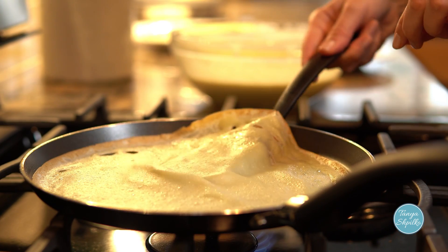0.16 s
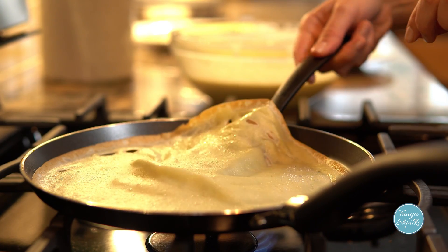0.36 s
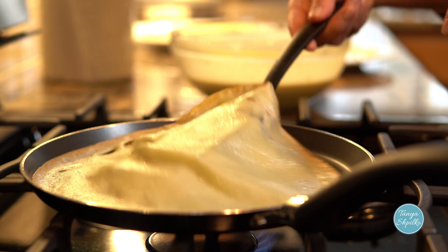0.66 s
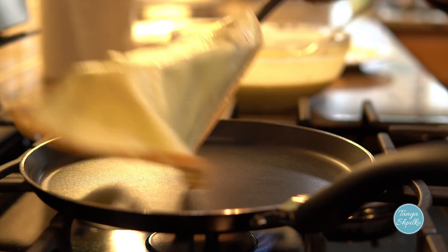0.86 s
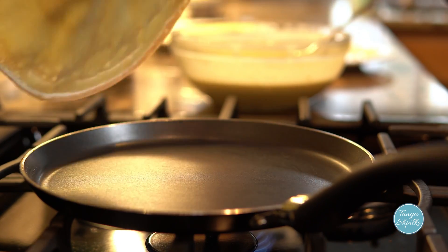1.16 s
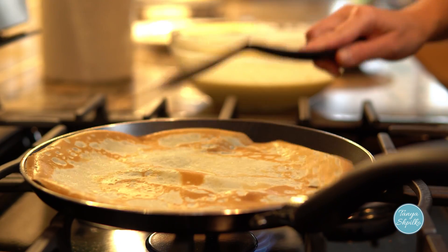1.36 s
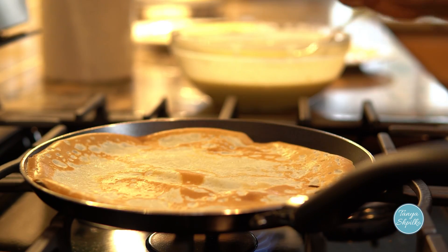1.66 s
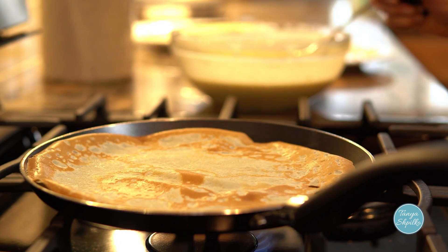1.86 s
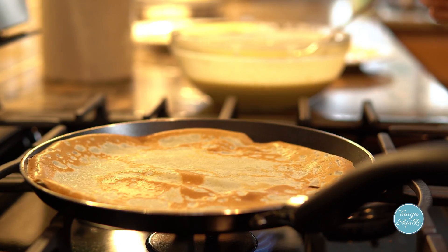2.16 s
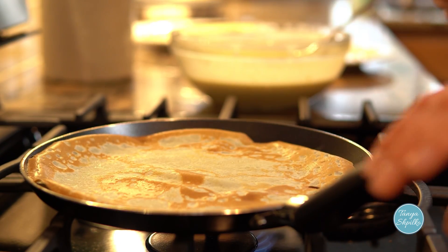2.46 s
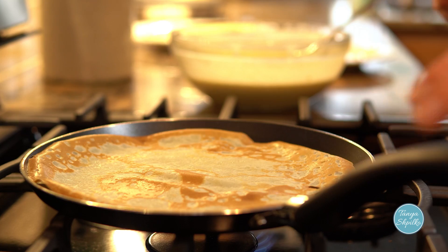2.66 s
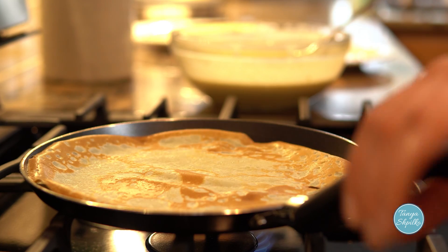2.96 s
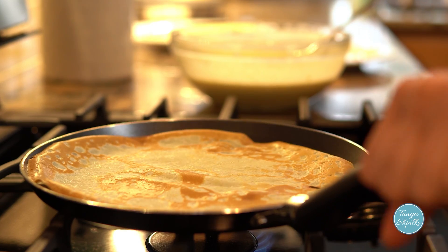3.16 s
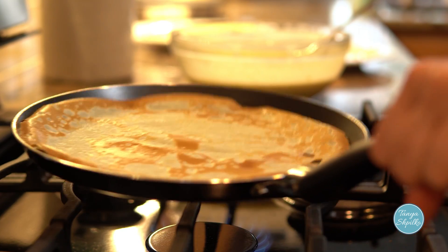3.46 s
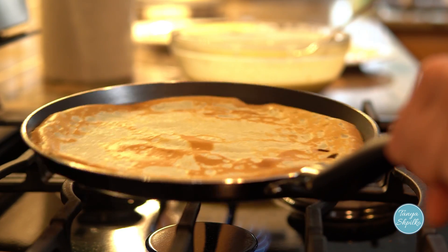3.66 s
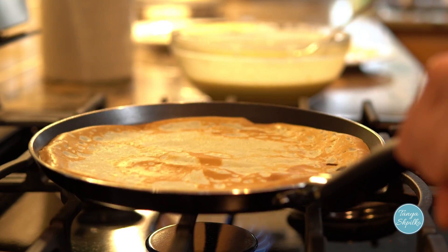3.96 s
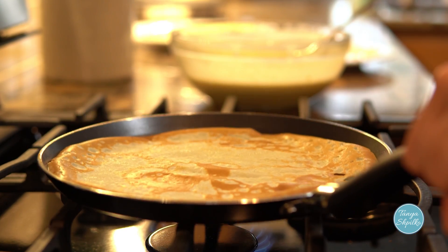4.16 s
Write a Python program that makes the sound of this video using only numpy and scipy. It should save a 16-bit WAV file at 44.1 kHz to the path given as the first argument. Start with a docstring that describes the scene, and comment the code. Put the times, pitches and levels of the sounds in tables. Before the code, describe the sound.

A spatula rasps under a thin crepe, it slaps wetly into a hot pan, sizzles and spits, then the pan scrapes and knocks on its grate.

```python
"""A small kitchen with a low hum and faint burner hiss: a spatula slides under a thin crepe in a hot pan.
The spatula rasps and rings by friction; the flipped crepe slaps down wetly and rings the damped pan.
Bursting bubbles sizzle and thin out as the batter dries; spitting fat ticks and rings the pan's hollow.
The pan is then dragged across the iron grate: it rocks, chatters and knocks the bars into ringing."""
import sys
import numpy as np
from scipy import signal
from scipy.fft import rfft, irfft, next_fast_len
from scipy.io import wavfile
from scipy.ndimage import uniform_filter1d

SR = 44100
rng = np.random.default_rng(int(sys.argv[2]) if len(sys.argv) > 2 else 0)


def put_to_file(sound):
    """Save the sound as 16-bit audio at rate SR, in the file named by the first command-line argument."""
    columns = np.atleast_2d(sound).T  # one column per channel
    safe = np.clip(columns, -1, 1)
    whole_steps = np.round(safe * 32767)
    wavfile.write(sys.argv[1], SR, whole_steps.astype(np.int16))


def how_loud(loudness_db):
    """Turn decibels into a plain amplitude multiplier (0 dB gives 1, 20 dB gives 10)."""
    steps = np.asarray(loudness_db, float) / 20
    return 10 ** steps


N = 190268  # length in samples

# Left-right likeness of diffuse sound: f/Hz, likeness (0 to 1)
DIFFUSE_LIKENESS = [(60, 0.78), (190, 0.83), (300, 0.86), (400, 0.91), (700, 0.36), (1650, 0.73),
                    (5000, 0.17), (15000, 0.14)]
# Resonances of the pan's hollow: f/Hz, width/Hz, level/dB
HOLLOW = [(2270, 490, 3), (3164, 100, 10.5), (3710, 690, 3), (6680, 490, 1.5)]


def evened(x):
    """Normalization: scales a signal to rms 1."""
    return x / np.sqrt(np.mean(x ** 2) + 1e-20)


def read(points, hz):
    """Interpolates a table of values over logarithmic frequency."""
    f, value = np.transpose(points)
    return np.interp(np.log(hz + 1), np.log(f + 1), value)


def humps(peaks, hz):
    """Resonance curves: dB raised around each centre, halved at half its width away."""
    return sum(db / (1 + (2 * (hz - f) / width) ** 2) for f, width, db in peaks)


def add(mix, s, sound):
    """Superposition: adds a sound to the mix from time s, in seconds."""
    part = mix[..., round(s * SR):][..., :sound.shape[-1]]
    part += sound[..., :part.shape[-1]]


def fade_mask(start_s, end_s):
    """A gate from 0 to 1 and back that fades in and out within 10 ms."""
    t = np.arange(N) / SR
    return np.clip(np.minimum(t - start_s, end_s - t) * 100, 0, 1)


def slopes_db(at_s, rise_db_per_s, fall_db_per_s):
    """Exponential growth and decay: dB relative to a peak, before and after it."""
    t = np.arange(N) / SR - at_s
    return np.where(t < 0, rise_db_per_s * t, -fall_db_per_s * t)


def colour(x, spectrum):
    """Linear filtering: weights the frequencies by a spectrum in dB and sets rms 1."""
    size = next_fast_len(len(x))
    gain = how_loud(read(spectrum, np.fft.rfftfreq(size, 1 / SR)))
    return evened(irfft(rfft(x, size) * gain, size)[:len(x)])


def resonate(x, hz, width):
    """Resonance of gain 1 by heterodyning: shifts hz down to zero, smooths, and shifts back."""
    turn = np.exp(2j * np.pi * np.cumsum(hz * np.ones(len(x))) / SR)
    r = np.exp(-np.pi * width / SR)
    return 2 * (turn * signal.lfilter([1 - r], [1, -r], x / turn)).real


def clicks(per_s, spread_db, channels=1):
    """Shot noise: random clicks of random sign, a few much larger than the rest; rms 1."""
    hit, sign, size = rng.random((3, channels, N))
    height = how_loud(spread_db * np.minimum(-np.log(1 - size), 5))
    return evened((hit < per_s / SR) * np.sign(sign - .5) * height)


def ringing(modes):
    """Modal impulse response: decaying sines that answer one unit blow."""
    t = np.arange(SR) / SR
    return sum(how_loud(db - 60 * t / t60) * np.sin(2 * np.pi * hz * t) for hz, db, t60 in modes)


def spread(pair, same, field_db):
    """Partial coherence: makes two signals partly alike, with levels set over frequency and time."""
    hz, t, (a, b) = signal.stft(pair, SR, nperseg=512, noverlap=384)
    like = np.clip(read(same, hz), -1, 1)[:, None]
    z = np.array([a, like * a + np.sqrt(1 - like ** 2) * b]) * how_loud(field_db(hz[:, None], t))
    return signal.istft(z, SR, nperseg=512, noverlap=384)[1][:, :N]


def kitchen():
    """Stationary noise: steady hum of the room and hiss of the gas jets, partly coherent left to right."""
    # Bands that stand out of the hum: f/Hz, width/Hz, level/dB
    jets = [(78.5, 25, 3.5), (94.9, 21.3, 10.5), (368, 29, 9), (2966, 130, 16.5), (3880, 700, 15)]
    # Relative spectrum of the hum: f/Hz, level/dB per Hz
    hum = [(20, -17), (40, -17.5), (59, -2.5), (120, -13.5), (184, -14.5), (262, -15.5), (404, -15.5),
           (450, -23), (751, -22), (1100, -30), (2600, -34), (4500, -39.5), (8000, -39.5), (12500, -44.5),
           (16000, -59)]
    size = next_fast_len(N)
    hz = np.fft.rfftfreq(size, 1 / SR)
    a, b = rfft(rng.standard_normal((2, size)))
    like = np.clip(read(DIFFUSE_LIKENESS, hz), -1, 1)
    z = np.array([a, like * a + np.sqrt(1 - like ** 2) * b]) * how_loud(read(hum, hz) + humps(jets, hz))
    return how_loud(-61.5) * evened(irfft(z, size)[:, :N])


def sizzle():
    """Bubble bursts over steam hiss: as the batter dries the low, large bubbles die out."""
    # Relative spectrum, big bubbles of fresh batter: f/Hz, level/dB per Hz
    wet = [(410, -45), (700, -17), (909, -42), (1130, -21.5), (1470, -0.5), (2690, -5), (3190, -3.5),
           (5100, -4.5), (6360, -4), (8160, -6.5), (13800, -10.5), (15900, -13.5)]
    # Relative spectrum, small bubbles of the dried side: f/Hz, level/dB per Hz
    dried = [(710, -37), (1200, -19.5), (1750, -19), (2040, -5.5), (2560, -15), (3210, -5.5), (4300, -0.5),
             (4790, -4), (6620, 1), (8210, -6.5), (11100, -4.5), (15900, -13.5)]
    # Left-right likeness of the frying: f/Hz, likeness (0 to 1)
    likeness = [(60, 1.0), (180, 0.96), (550, 0.84), (1650, 0.76), (4970, 0.43), (15000, 0.35)]
    # Left-right level difference of the frying: f/Hz, level/dB
    left_db = [(60, 7), (180, 0.0), (550, 4.5), (1650, 0.5), (4970, 2.7), (15000, 1.8)]
    # Sizzle of the raw second side, from the landing on: t/s, nominal treble level/dB
    second = [(1.36, -49), (1.41, -36.5), (1.46, -43.5), (1.6, -44), (2.06, -47), (2.599, -47), (3.2, -50),
              (3.8, -51), (4.32, -53.5)]
    s, second_db = np.transpose(second)
    peel_s = 0.925
    bubbles = 0.8 * clicks(per_s=2500., spread_db=2.0, channels=2) + 0.73 * rng.standard_normal((2, N))
    # random level patches over frequency and time
    patches = rng.standard_normal((257, N // 128 + 9))
    patches = evened(uniform_filter1d(uniform_filter1d(patches, size=30, axis=0), size=12, axis=1))

    def field_db(hz, t):
        drying = np.clip((t - 1.436) / 1.93, 0, 1)  # starts at 1.436 s, takes 1.93 s
        dry = np.where(t < (peel_s + s[0]) / 2, 0.24, drying)  # the first side stays at 0.24
        shape = (1 - dry) * read(wet, hz) + dry * read(dried, hz) + humps(HOLLOW, hz)
        # the power above 4.5 kHz is held, so drying changes the balance against it
        treble_db = 10 * np.log10((how_loud(2 * shape) * (hz > 4500)).sum(0) / len(hz))
        side = np.array([.5, -.5])[:, None, None] * read(left_db, hz)
        return shape - treble_db + 1.27 * patches[:, :len(t)] + side

    t = np.arange(N) / SR
    # the cooked first side barely whispers, fading 19 dB per s, until it is peeled off the pan
    first = fade_mask(-1, peel_s) * how_loud(-75.5 - 19 * t)
    peel = how_loud(-68 + slopes_db(peel_s, rise_db_per_s=91, fall_db_per_s=456))
    level = first + peel + fade_mask(s[0], s[-1]) * how_loud(np.interp(t, s, second_db))
    return level * spread(bubbles, likeness, field_db)


def spits():
    """Impulsive excitation: a bursting fat drop ticks, fizzes, rings the pan's hollow and sprays treble."""
    # Clearest spits, peaks before the bass cut: t/s, hollow level/dB, spray level/dB, left-right level/dB
    clear_spits = [(0.171, -40.5, -61.0, 4), (0.4603, -64, -63, 10), (0.4886, -72, -64, 2),
                   (0.5113, -59, -51, 5), (0.5242, -64.0, -54, 12), (0.582, -54.5, -58, 2),
                   (0.632, -62, -61, 13), (1.1549, -54.5, -66, 6), (1.5373, -31, -29, 2.0),
                   (1.6438, -25.5, -24.5, 2), (1.6898, -42, -25, 5), (1.8, -29.5, -38, 0),
                   (2.0435, -35, -33, -5), (2.146, -51, -35, 0.0), (2.573, -34, -34, 3),
                   (2.6652, -46, -26.5, 6), (2.794, -34.5, -29, 4), (3.0778, -50, -35, 4),
                   (3.5592, -38, -27, 3), (3.8028, -58, -36, 1.0), (4.035, -61, -56, 2.0)]
    # Small random spits, one row a side: from t/s, to t/s, how many, hollow level/dB, spray level/dB
    small_spits = [(.02, .7, 12, -63, -71), (1.5, 4.25, 8, -50, -44)]
    out, t, rows = np.zeros((2, N)), np.arange(2000) / SR, list(clear_spits)
    for start, end, many, hollow_db, spray_db in small_spits:
        when = rng.uniform(start, end, many)
        a, b, c = 4 * rng.standard_normal((many, 3)).T  # scatter in dB
        rows += zip(when, hollow_db + a, spray_db + b, 4 + c / 2)
    for s, hollow_db, spray_db, pan_db in rows:
        # short and long fizz, t60 of 9 ms and 60 ms, behind a unit tick
        fizz = rng.standard_normal(2000) * (.3 * how_loud(-60 * t / .009) + .06 * how_loud(-60 * t / .06))
        fizz[0] = 1
        hollow = sum(resonate(resonate(fizz, hz, 1100), hz, 1100) for hz, *_ in HOLLOW[1:])
        spray = resonate(resonate(fizz, 10300, 8400), 10300, 10000)
        burst = how_loud(hollow_db) * hollow / abs(hollow).max() + how_loud(spray_db) * spray / abs(spray).max()
        add(out, s, burst * how_loud([[pan_db / 2], [-pan_db / 2]]))
    # tiny drops make no bass
    return signal.sosfilt(signal.butter(2, 2300, "high", fs=SR, output="sos"), out)


def bumps():
    """Rubbing friction: dull, soft-edged rubs on the worktop, a rough sagging hum with a hollow upper part."""
    # Rubs: start t/s, length t/s, low level/dB, low f/Hz at the start, upper level/dB
    rubs = [(2.396, 0.048, -54, 214.7, -58), (2.845, 0.14, -52.5, 152, -81)]
    out, noise = np.zeros(N), rng.standard_normal(N)
    upper = evened(resonate(resonate(noise, 380, 160), 380, 160))
    for s, length, low_db, start_hz, upper_db in rubs:
        t = np.arange(N) / SR - s
        low_hz = start_hz - 189 * np.clip(t, 0, length)  # sags 189 Hz per s
        # rises in 15 ms, fades 25 dB per s, and 270 dB per s faster once let go
        fall_db = -25 * t - 270 * np.maximum(t - length, 0)
        shape = np.clip(t / .015, 0, 1) * how_loud(fall_db)
        rough = evened(resonate(resonate(noise, low_hz, 56), low_hz, 57))
        low = 0.79 * np.sin(2 * np.pi * np.cumsum(low_hz) / SR) + 0.68 * rough
        out += shape * (how_loud(low_db) * low + how_loud(upper_db) * upper)
    return out


def spatula():
    """Friction excitation: grit rasps on the pan and rings the flexing blade and its tip."""
    # Pushes, before rounding: hardest pressure t/s, build-up/(dB/s), rasp, blade and tip level/dB
    strokes = [(0.113, 398, -48.5, -56, -53), (0.236, 179, -58.5, -58, -66), (0.884, 233, -53, -46.5, -85)]
    # Relative spectrum of the rasp: f/Hz, level/dB per Hz
    rasp_spectrum = [(760, -19.5), (1300, -9), (1630, -4), (1840, -3), (2280, -10.5), (2740, -10.5),
                     (3300, -4.5), (4010, -14), (6220, -16.5), (8370, -28), (15000, -52)]
    tip_hz = 1284
    grit = 0.95 * clicks(per_s=2600.0, spread_db=1.5)[0] + 0.53 * rng.standard_normal(N)
    out, rasp = np.zeros(N), colour(grit, rasp_spectrum)
    tip = evened(resonate(resonate(grit, tip_hz, 220), tip_hz, 220))
    for s, rise_db_per_s, rasp_db, blade_db, tip_db in strokes:
        # pressure peaks are rounded over 17 ms; the tip bites 17 ms ahead
        press_db = uniform_filter1d(slopes_db(s, rise_db_per_s, fall_db_per_s=522), round(0.017 * SR))
        bite_db = np.interp(np.arange(N) + 0.017 * SR, np.arange(N), press_db)
        # the blade ring rises 5 Hz per dB as it is pressed
        blade_hz = 858 + 5 * np.maximum(press_db, -20)
        blade = evened(resonate(resonate(grit, blade_hz, 190), blade_hz, 190))
        out += how_loud(press_db) * (how_loud(rasp_db) * rasp + how_loud(blade_db) * blade)
        out += how_loud(bite_db + tip_db) * tip
    return out


def drag():
    """Impact and modal response: the pan rocks and chatters; some blows also ring the high bars."""
    # Modes of the grate: f/Hz, level/dB, t60/s
    grate = [(392, -10.5, 0.15), (539.4, -18, 0.6), (559, -20, 0.6), (650, -15, 0.38), (717, -18, 0.48),
             (747, -20, 0.42), (877, -19, .3), (1012, -21, 0.33), (1178, -16, 0.43), (1308, -20, 0.36),
             (1357, -22, 0.4), (1410, -21, 0.38), (1513, -17, 0.38), (1749, -2, 0.36), (1790, -7, 0.45),
             (2140, -12, 0.3), (2420, -24, .3)]
    # Relative spectrum of the grit: f/Hz, level/dB per Hz
    grit_spectrum = [(180, -50), (300, 3), (876, -0.5), (1200, -3.5), (1480, -10), (1690, -6.5), (2080, -6),
                     (6510, -20), (8000, -38), (10400, -61), (17600, -120)]
    # Spatula or pan base catches on metal: t/s, peak level/dB, knock f/Hz
    catches = [(0.877, -36, 1900), (3.227, -30, 2140), (3.228, -38, 4830), (3.265, -43, 1080),
               (3.296, -33, 3570), (3.311, -27.5, 4300), (3.314, -33.5, 6400), (3.326, -27, 1720),
               (3.3402, -15, 1300), (3.343, -24.5, 2310), (3.357, -25, 1700)]
    # The loaded pan rocks on its supports: t/s, level/dB before the soft onset, f/Hz
    rocks = [(3.178, -36, 206), (3.194, -28, 231), (3.232, -23.5, 217.4), (3.257, -26.5, 200),
             (3.29, -28, 214), (3.323, -26, 198.7), (3.342, -26.5, 266.5), (3.374, -31, 187),
             (3.419, -38, 209)]
    # Blows that reach the free bars of the grate: t/s, level/dB
    bar_blows = [(3.326, -33.5), (3.356, -36), (3.387, -33.5)]
    # the drag builds up to its hardest moment, then lets go
    drag_db = -35.5 + slopes_db(3.324, rise_db_per_s=87, fall_db_per_s=107)
    chatter = fade_mask(3.18, 3.46) * how_loud(drag_db) * clicks(per_s=550., spread_db=3.)[0]
    dull = ringing([mode for mode in grate if mode[0] < 1600])
    bright = ringing([mode for mode in grate if mode[0] >= 1600])
    # the loose pan makes the low bars waver
    dull *= 1 + .75 * evened(uniform_filter1d(rng.standard_normal(SR), size=900))
    out = how_loud(-2.5) * colour(chatter, grit_spectrum) * np.std(chatter)
    blows, t = np.zeros(N), np.arange(SR // 4) / SR
    for s, rock_db, hz in rocks:
        onset = 1 - np.exp(-t / 0.0048)
        add(out, s, how_loud(rock_db - 60 * t / .13) * onset * np.sin(2 * np.pi * hz * t))
    for s, peak_db, hz in catches:
        crack = rng.choice([-1., 1.], len(t)) * how_loud(-60 * t / .02)  # t60 of 20 ms
        crack = resonate(resonate(crack, hz, 1460), hz, 1460)
        add(out, s, how_loud(peak_db) * crack / abs(crack).max())
    for s, db in bar_blows:
        blows[round(s * SR)] = how_loud(db)
    # chatter rings the low bars; a bar blow rings the high bars and, turned down 10.5 dB, the low ones
    out += signal.oaconvolve(how_loud(-5) * chatter, dull / np.linalg.norm(dull))[:N]
    return out + signal.oaconvolve(blows, bright + how_loud(-10.5) * dull)[:N]


def slap():
    """Impact on a damped plate: each landing fold is a wet splat and a soft push that rings the pan."""
    # Parts of the crepe landing: t/s, splat level/dB, push on the pan level/dB
    folds = [(1.361, -38, -58), (1.371, -21, -44), (1.387, -30.5, -50), (1.4049, -22.5, -41.5),
             (1.4127, -22.5, -43), (1.432, -41, -36.5)]
    # Relative spectrum of the splat: f/Hz, level/dB per Hz
    splat_spectrum = [(260, -43), (450, 3.5), (631, -10.5), (846, -0.5), (1200, -4.5), (1650, 1.5),
                      (2040, -3), (2190, -5), (3170, -4), (5450, -20.5), (5870, -22.5), (15000, -29)]
    # Modes of the damped pan: f/Hz, level/dB, t60/s
    pan_modes = [(141, -17, 0.088), (200.5, 0, 0.13), (231, 2, 0.2), (364, -14, 0.18), (411.2, -6.5, 0.32),
                 (465, -19.5, 0.45), (560, -11.5, 0.21)]
    splats, pushes, t = np.zeros(N), np.zeros(N), np.arange(SR // 4) / SR
    splash = 0.67 * clicks(per_s=1200.0, spread_db=0.5)[0] + 0.73 * rng.standard_normal(N)
    wet_noise = colour(splash, splat_spectrum)
    for s, splat_db, push_db in folds:
        add(splats, s, how_loud(splat_db - 60 * t / 0.057))  # t60 of 57 ms
        pushes[round(s * SR)] = how_loud(push_db)
    return splats * wet_noise + signal.oaconvolve(pushes, ringing(pan_modes))[:N]


def room(x):
    """Reverberation: sparse taps of random sign, each band decaying at its own rate; little bass returns."""
    # Decay of the room: f/Hz, t60/s
    decay = [(200, 0.34), (1000, 0.32), (4000, 0.35), (12000, 0.31)]
    x = signal.lfilter(*signal.butter(2, 260, "high", fs=SR), x)
    taps = np.zeros((2, SR))
    at = np.arange(200, SR - 20, 20)  # one tap at random in each 20 samples
    at = at + rng.integers(0, 20, (2, len(at)))
    np.put_along_axis(taps, at, rng.choice([-1., 1.], at.shape), 1)
    tail = spread(taps, DIFFUSE_LIKENESS, lambda hz, t: -60 * t / read(decay, hz))
    return signal.fftconvolve(x[None], tail / np.linalg.norm(tail[0]), axes=1)[:, :N]


def placed(x, left_db):
    """Interchannel time and level: the right port hears a sample late; levels differ only in the treble."""
    treble = signal.lfilter(*signal.butter(1, 900, "high", fs=SR), x)
    left, right = x + treble * (how_loud([[left_db / 2], [-left_db / 2]]) - 1)
    return np.array([left, np.append(0, right[:-1])])


def scene():
    """Superposition: direct sound, its reverberation, the kitchen and the frying."""
    high = signal.butter(2, 80, "high", fs=SR, output="sos")  # the small pan radiates no deep bass
    flip, handling = signal.sosfilt(high, [slap(), spatula() + drag() + bumps()])
    direct = placed(flip, left_db=3.5) + placed(handling, left_db=4.0)
    return direct + how_loud(-6.5) * room(flip + handling) + kitchen() + sizzle() + spits()


def roll_off(x):
    """The treble ends steeply here."""
    return signal.sosfilt(signal.butter(12, 16030, fs=SR, output="sos"), x)


def record(dry):
    """Long-wave coherence: close ports hear the bass alike; the band ends at 16 kHz."""
    mid, side = dry.mean(0), (dry[0] - dry[1]) / 2
    side = signal.lfilter(*signal.butter(2, 280, "high", fs=SR), side)
    edge = signal.firwin(511, 16000, window=("kaiser", 9), fs=SR)
    mix = signal.oaconvolve([mid + side, mid - side], edge[None], "same")
    return roll_off(mix)


dry = scene()
out = record(dry)
put_to_file(out)
```